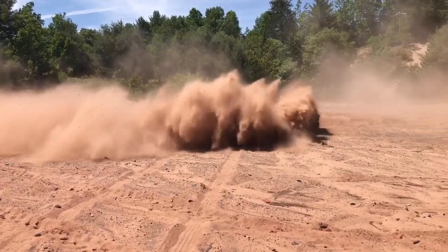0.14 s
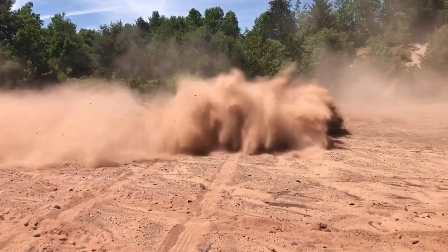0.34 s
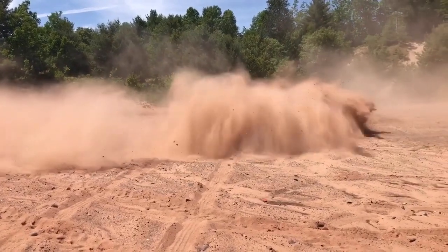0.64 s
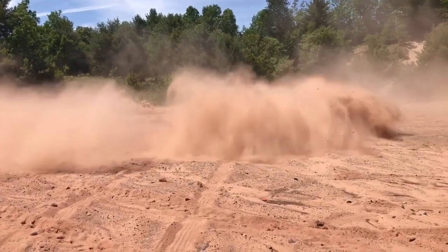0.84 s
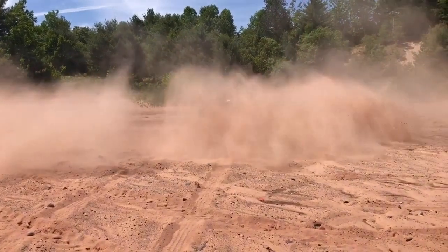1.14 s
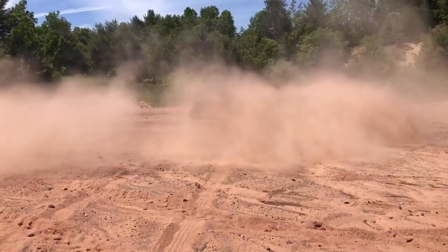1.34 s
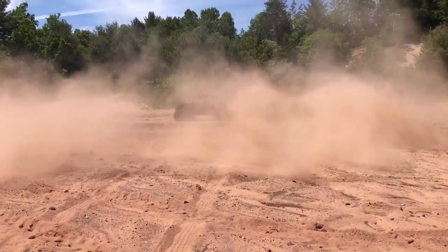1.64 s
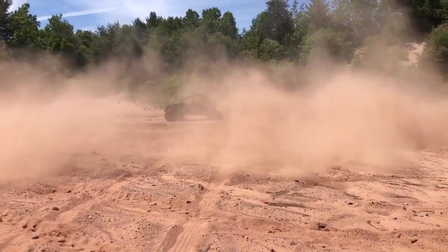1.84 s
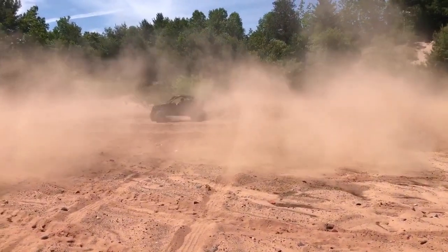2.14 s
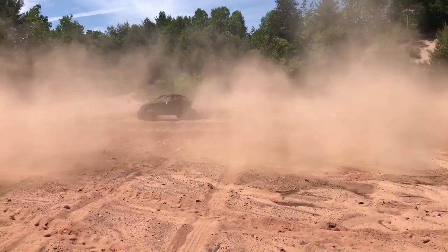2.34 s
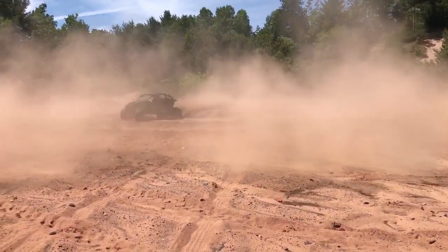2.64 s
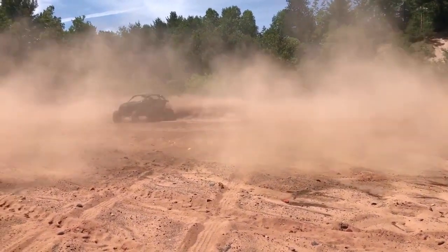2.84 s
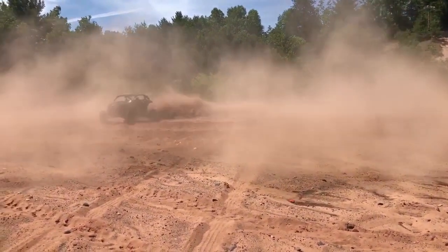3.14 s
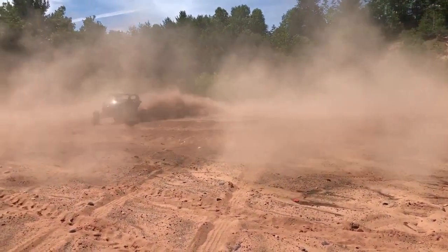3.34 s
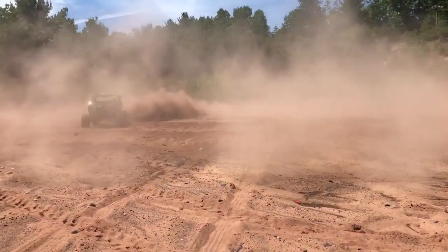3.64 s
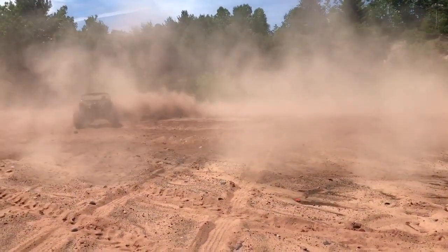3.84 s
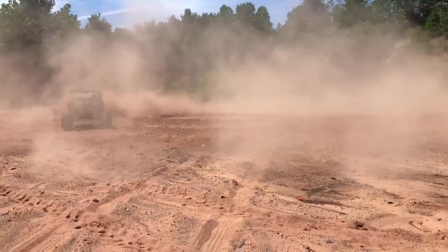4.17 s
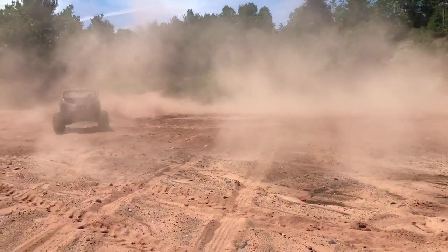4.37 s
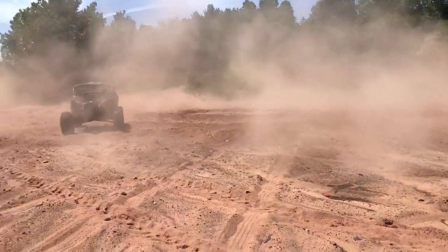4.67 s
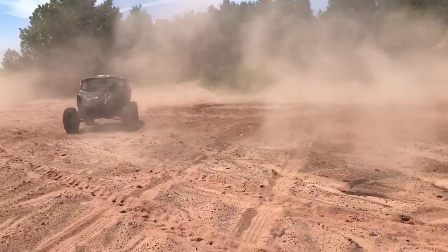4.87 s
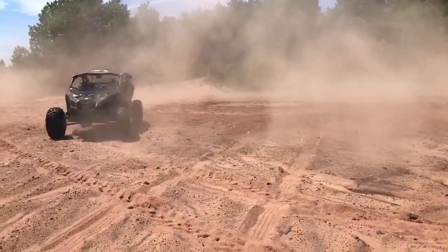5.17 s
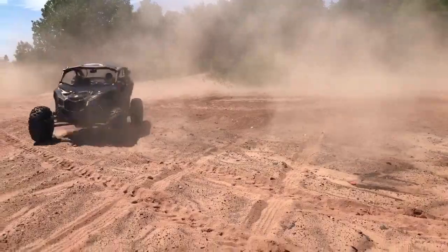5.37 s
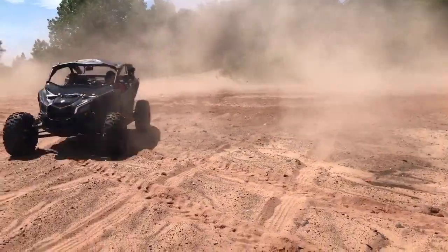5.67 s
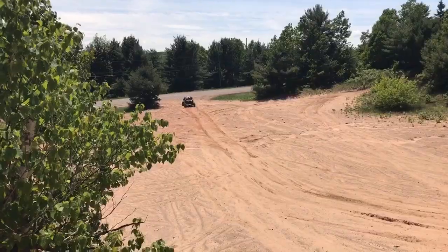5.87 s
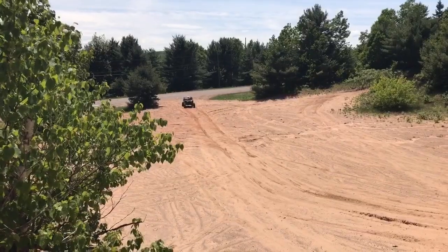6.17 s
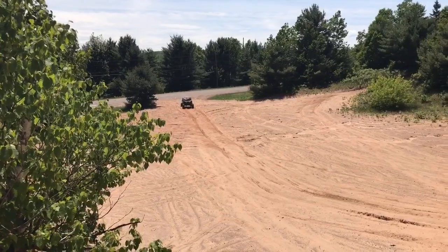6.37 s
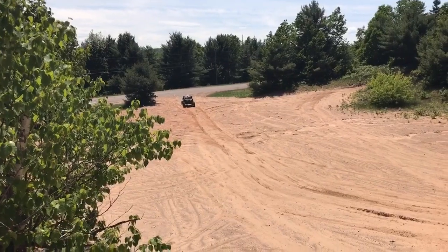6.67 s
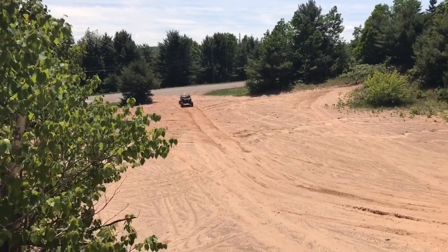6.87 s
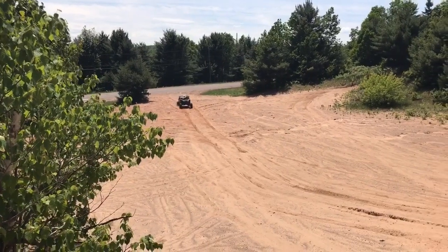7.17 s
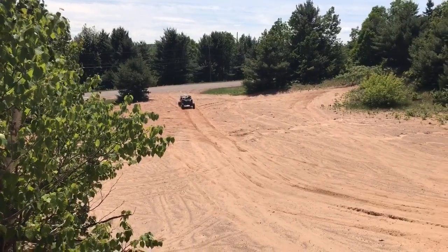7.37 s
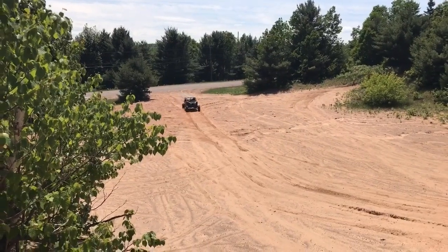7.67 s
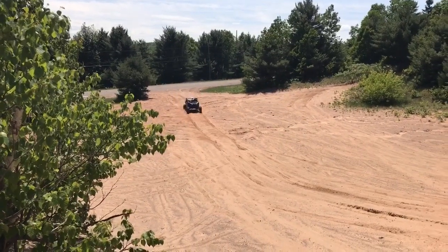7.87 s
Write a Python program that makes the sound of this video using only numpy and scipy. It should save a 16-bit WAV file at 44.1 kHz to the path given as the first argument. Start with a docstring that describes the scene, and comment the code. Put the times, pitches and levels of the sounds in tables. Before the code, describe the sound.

Outdoors on sand, a buggy engine drones at high revs as it passes near the microphone with a raspy exhaust, a short tyre howl and spraying grit. A belt whirrs along with it. The throttle closes and the note sinks to a low burble, while stones tick and the chassis squeaks. The sound cuts out for a moment, then returns duller and more distant, revving up and holding.

```python
"""You hear an off-road buggy slide past on loose sand at high revs, turn, and roll up as the throttle closes.
After a short silence the scene changes: the buggy is heard far away, revving high. Its three cylinders fire in
turn to make the engine note, while exhaust gas rasps and hisses in the tailpipe. The drive belt whirrs, the
tyres churn, spray sand and howl as they slide, small stones tick and the chassis squeaks."""
import sys
import numpy as np
from scipy import signal
from scipy.fft import rfft, irfft, next_fast_len
from scipy.io import wavfile

SR = 44100
rng = np.random.default_rng(int(sys.argv[2]) if len(sys.argv) > 2 else 0)


def materialize(psi):
    """Save the field psi as 16-bit PCM at rate SR to the path in sys.argv[1].

    A 1-D psi becomes a single channel; in a 2-D psi each row is a channel.
    """
    bounded = np.clip(np.atleast_2d(psi).T, -1, 1)
    quanta = np.round(bounded * 32767).astype(np.int16)
    wavfile.write(sys.argv[1], SR, quanta)


N = 353241
TIME = np.arange(N) / SR

# when the throttle is shut: (from [s], until [s], brief sag of the firing note [dB])
LIFT_OFF_TIMES = [(4.596, 4.659, -6), (5.026, 5.6, -5)]


def from_db(db):
    """Turn decibels into a gain."""
    return 10 ** (np.asarray(db) / 20)


def unit_power(x):
    """Scale a sound to a power of 1."""
    return x / np.sqrt(np.mean(x ** 2) + 1e-20)


def unit_power_between(x, low_hz, high_hz):
    """Scale a sound so that one band of it has a power of 1."""
    part = rfft(x)[int(low_hz * N / SR):int(high_hz * N / SR)]
    return x * N / np.sqrt(2 * np.sum(np.abs(part) ** 2))


def curves(rows):
    """Join the rows of a time table into one curve for each value column."""
    times, *columns = np.transpose(rows)
    return [np.interp(TIME, times, column) for column in columns]


def gain_at(spectrum, hz):
    """Look up a gain in a spectrum table."""
    table_hz, db = np.transpose(spectrum)
    return from_db(np.interp(np.log(hz + 1e-6), np.log(table_hz), db))


def colour(x, spectrum):
    """Shape a sound's lows and highs with a spectrum table."""
    size = next_fast_len(N)
    hz = np.arange(size // 2 + 1) * SR / size
    return irfft(rfft(x, size) * gain_at(spectrum, hz), size)[:N]


def band(x, low_hz, high_hz):
    """Keep what lies between two frequencies."""
    sos = signal.butter(3, [low_hz, min(high_hz, SR * .45)], "band", fs=SR, output="sos")
    return signal.sosfilt(sos, x)


def drift(rate_hz):
    """A smooth random wander, about 1 in size."""
    step = 40  # samples between random points
    pole = np.exp(-2 * np.pi * step * rate_hz / SR)
    slow = signal.lfilter([1], [1, -2 * pole, pole * pole], rng.standard_normal(N // step + 2002))[2000:]
    return np.interp(np.arange(N) / step, np.arange(len(slow)), unit_power(slow))


def bump(centre_s, half_s):
    """A smooth rise to 1 and back."""
    return np.exp(-((TIME - centre_s) / half_s) ** 2)


def sweep_past(full_s, until_s, db, rise_db_per_s, fall_db_per_s):
    """The gain of a passing sound: it rises, holds and dies away."""
    before, after = np.maximum(full_s - TIME, 0), np.maximum(TIME - until_s, 0)
    return from_db(db - rise_db_per_s * before - fall_db_per_s * after)


def resonate(strength, modes, flutter_db):
    """Noise rings in several resonances, and each flutters by itself."""
    out = np.zeros(N)
    for hz, width, db in modes:
        gain = from_db(db + flutter_db * drift(15))
        out += gain * band(strength * rng.standard_normal(N), hz - width / 2, hz + width / 2)
    return unit_power(out)


def grains(per_s, spread_db):
    """Tiny random impacts of unequal size."""
    sizes = from_db(spread_db * np.minimum(rng.exponential(1, N), 4)) * rng.choice([-1, 1], N)
    return unit_power(sizes * (rng.random(N) < per_s / SR))


def throttle_shut(move_s=0.018):
    """0 while the throttle is open, 1 while it is shut."""
    return sum(np.clip(np.minimum(TIME - start, end - TIME) / move_s + .5, 0, 1)
               for start, end, _ in LIFT_OFF_TIMES)


def harmonic_levels(firing_hz, note_db, overtones_db, sag_s=0.053, silencer_hz=384.4):
    """The first three exhaust harmonics in dB; shutting the throttle takes the edge off the pulses."""
    # overtones fade or swell as the buggy turns:
    # (time [s], half length [s], second harmonic change [dB], third harmonic change [dB])
    turns = [(1.83, .055, -35, 0), (2.049, 0.29, -4.5, 1.5), (2.293, 0.13, -14.5, 2),
             (2.617, 0.044, -6.5, -1), (2.85, 0.29, -2.5, -15), (3.311, 0.13, -12.5, 0),
             (6.004, 0.73, -2.5, 10.5), (6.853, 0.34, 1, 6.5)]
    shut = throttle_shut()
    silencer_db = 59.5 * np.maximum(np.log2(3 * firing_hz / silencer_hz), 0)  # bites at high revs
    first = note_db + sum(db * bump(start + sag_s / 2, sag_s / 2) for start, _, db in LIFT_OFF_TIMES)
    second = overtones_db - 17 * shut
    third = overtones_db - 2 - 14 * shut - silencer_db
    for at_s, half_s, second_db, third_db in turns:
        second += second_db * bump(at_s, half_s)
        third += third_db * bump(at_s, half_s)
    return [db + 0.95 * drift(6) for db in (first, second, third)]


def exhaust(firing_hz, phase, levels_db):
    """Each firing is one rounded pressure pulse; the silencer lets little out above the third harmonic."""
    # how the pipe passes the upper harmonics: (frequency [Hz], gain [dB])
    pipe = [(200, -6), (300, -9), (370, -1.5), (450, -15.5), (520, -26.5), (620, -17.5), (700, -41.5)]
    throb = from_db(0.45 * drift(25))
    low = sum(from_db(db) * np.cos(k * phase) for k, db in enumerate(levels_db, 1))
    upper = sum(from_db(db) * gain_at(pipe, k * firing_hz) * np.cos(k * phase)
                for k, db in ((4, 0), (5, -3)))
    return -np.sqrt(2) * throb * (low + from_db(levels_db[2]) * upper)


def rumble(firing_hz, full_revs_hz=155):
    """Low engine noise that grows by 5 dB for each octave the revs sink."""
    # rumble spectrum: (frequency [Hz], gain [dB])
    spectrum = [(15, -23.5), (30, -4.5), (50, 2), (110, 2), (160, -15.5), (300, -16.5), (600, -21.5),
                (900, -21), (1800, -55.5)]
    gain = from_db(-28.5 + 5 * np.log2(full_revs_hz / firing_hz))
    return gain * unit_power(colour(rng.standard_normal(N), spectrum))


def burble(phase, overtones_db):
    """Unequal cylinders add wavering tones at thirds of the firing rate; noise fills the gaps."""
    # the tones: (multiple of a third of the firing rate, relative level [dB])
    uneven = [(1, -8.5), (4, -3), (5, -3.5), (7, -5), (8, -13)]
    # the noise between them: (frequency [Hz], gain [dB])
    spectrum = [(50, -15), (130, -0.5), (230, 1), (340, -2), (440, -7.5), (540, -21.5), (1000, -58.5)]
    # the engine stumbles with a low, rough thud: (time [s], level [dB])
    stumbles = [(0.37, -31), (1.14, -18), (1.46, -22), (4.63, -23)]
    tones = sum(from_db(db + 5 * drift(7)) * np.cos(k * phase / 3 + 0.7 * drift(6)) for k, db in uneven)
    noise = from_db(4) * unit_power(colour(rng.standard_normal(N), spectrum))
    gain = from_db(-11 + 0.9 * overtones_db - 2 * throttle_shut())
    thuds = sum(from_db(db) * bump(at_s, half_s=0.026) for at_s, db in stumbles)
    return (gain + thuds) * unit_power(unit_power(tones) + noise)


def engine(firing_hz, phase, crank):
    """The exhaust note, a shake at each turn of the crankshaft, rumble and burble."""
    # the engine's base levels: (time [s], firing note [dB], overtones [dB], crank shake [dB])
    loudness = [(0, -14, -11.5, -34), (0.36, -13.5, -10, -29), (0.43, -16, -16, -24.5),
                (0.58, -14, -11, -33.5), (0.85, -12.5, -13.5, -34), (1.1, -19.5, -13, -28.5),
                (1.45, -17.5, -15.5, -32), (1.6, -19, -18, -24.5), (2.15, -24, -13, -25.5),
                (2.35, -13.5, -16.5, -26), (2.9, -16, -15.5, -27), (3.7, -15.5, -15, -21.5),
                (4.3, -13.5, -13.5, -21), (4.57, -18.5, -20.5, -19), (4.7, -11, -21, -32),
                (5.55, -12.5, -22, -44), (5.82, -17.5, -32, -26.5), (6.35, -19.5, -37, -25),
                (6.58, -18, -28.5, -33), (8, -15, -29, -30)]
    note_db, overtones_db, shake_db = curves(loudness)
    note = exhaust(firing_hz, phase, harmonic_levels(firing_hz, note_db, overtones_db))
    shake = from_db(shake_db + 1.8 * drift(9)) * np.cos(crank + 0.47 * drift(7))
    return note + shake + rumble(firing_hz) + burble(phase, overtones_db)


def belt_whirr(crank):
    """The rubbing drive belt rings in one moving resonance, pulsing with the crankshaft."""
    # the whirr: (time [s], level [dB], centre [Hz])
    belt = [(0, -32.5, 2156), (1.35, -23.5, 2230), (1.62, -24.5, 2200), (2.2, -23, 2250), (2.48, -26, 2300),
            (2.9, -24, 2334), (3.45, -28, 2388), (3.72, -37, 2482), (4.3, -33, 2523), (4.7, -40.5, 2490),
            (5.55, -40.5, 2517), (5.82, -23.5, 2174), (6.2, -27, 2181), (6.9, -23, 2173), (8, -22, 2220)]

    def wobble(width_hz):
        """Two random curves that blur a tone into a band of noise."""
        sos = signal.butter(2, width_hz / 2, fs=SR, output="sos")
        return unit_power(signal.sosfilt(sos, rng.standard_normal((2, N))))

    db, centre_hz = curves(belt)
    cos_part, sin_part = wobble(247) + from_db(-3) * wobble(895)  # a narrow peak on a broad base
    angle = 2 * np.pi * np.cumsum(centre_hz) / SR
    whirr = unit_power(cos_part * np.cos(angle) + sin_part * np.sin(angle))
    return from_db(db) * (1 + 0.13 * np.cos(crank)) * whirr


def patchy(x, depth_db, rate_hz, bands=13):
    """Sheets of sand shift, so each band of the sound swells and fades by itself."""
    spectrum, hz = rfft(x), np.arange(N // 2 + 1) * SR / N
    place = np.interp(hz, np.geomspace(600, 19200, bands), np.arange(bands))
    parts = (irfft(spectrum * np.maximum(1 - np.abs(place - k), 0), N) for k in range(bands))
    return sum(from_db(depth_db * drift(rate_hz)) * part for part in parts)


def sand(far):
    """Tyre treads churn the ground and throw clumps of grains; distance changes the tone of both."""
    # spinning wheels: (time [s], churn at 700-1150 Hz [dB], spray at 5000-6200 Hz [dB])
    wheelspin = [(0, -28.5, -37.5), (0.43, -31, -39), (0.57, -27, -31.5), (1.05, -29.5, -28.5),
                 (1.5, -31.5, -31.5), (1.62, -32, -34.5), (2.6, -31, -32.5), (3.5, -33.5, -33),
                 (3.68, -37.5, -42), (4.1, -38, -42), (4.33, -35, -40.5), (4.72, -42.5, -46.5),
                 (5.1, -40, -45.5), (5.55, -39.5, -45.5), (5.9, -40, -45), (6.05, -42, -51.5),
                 (6.3, -40.5, -53), (6.65, -39, -50), (8, -36.5, -44.5)]
    # spectra of churn and spray, near and far: (frequency [Hz], gain [dB])
    churn_near = [(200, -9), (450, -15), (600, -11.5), (760, -3.5), (950, 1), (1300, 1), (1650, -1),
                  (2000, -1), (2600, -16), (4000, -21.5), (9000, -58.5)]
    churn_far = [(200, -5), (450, 3), (660, -27), (900, -4), (1170, 2.5), (1430, -5), (1900, -1),
                 (3000, -7.5), (6000, -54)]
    spray_near = [(1200, -10), (2500, 0.5), (3200, 1.5), (4100, 4), (5200, -1), (5900, 0), (7400, -2),
                  (8400, -15), (9500, -15), (10600, -20), (12300, -16), (13500, -34), (15600, -36.5)]
    spray_far = [(1500, -5), (2800, 5.5), (3700, 6.5), (4800, 0), (6000, -5.5), (7500, -16.5),
                 (10000, -20.5), (12500, -25), (14000, -47), (15600, -33)]
    churn_db, spray_db = curves(wheelspin)
    clods = grains(per_s=9000, spread_db=3) * from_db(0.71 * drift(25))
    fine = grains(per_s=20000, spread_db=2.5) * from_db(0.76 * drift(35))
    churn = np.where(far, unit_power_between(colour(clods, churn_far), 700, 1150),
                     unit_power_between(colour(clods, churn_near), 700, 1150))
    spray = np.where(far, unit_power_between(colour(fine, spray_far), 5000, 6200),
                     unit_power_between(colour(fine, spray_near), 5000, 6200))
    return patchy(from_db(churn_db) * churn + from_db(spray_db) * spray, depth_db=1.22, rate_hz=4.9)


def tailpipe(phase):
    """Puffs of gas rasp in the pipe and hiss at its mouth, loudest while it points at the listener."""
    # resonances of the pipe and of its mouth: (centre [Hz], width [Hz], relative level [dB])
    rasp_modes = [(2087, 160, -3), (2305, 126, -1), (2820, 240, 1), (3533, 260, -6), (4570, 410, -12.5)]
    mouth_modes = [(6940, 780, 0.5), (9170, 1600, -8.5), (11400, 2000, -14)]
    # the rasp swells as the buggy passes and as its tail swings:
    # (full from [s], until [s], level [dB], rise [dB/s], fall [dB/s])
    surges = [(0.5, 1.83, -26, 8.5, 9), (0.72, 0.82, -16.5, 32, 25), (1.25, 1.46, -17.5, 24, 49)]
    rasp_gain = np.max([sweep_past(*surge) for surge in surges], axis=0)
    hiss_gain = sweep_past(full_s=0.9, until_s=1.25, db=-25, rise_db_per_s=17.5, fall_db_per_s=17.5)
    rasp = resonate(1 + 0.46 * np.cos(phase), rasp_modes, flutter_db=2.7)
    hiss = resonate(1 + 0.21 * np.cos(phase), mouth_modes, flutter_db=3)
    return rasp_gain * rasp + hiss_gain * hiss


def tyre_howl():
    """The tyres howl briefly as they slide past."""
    # resonances of the howl: (centre [Hz], width [Hz], relative level [dB])
    modes = [(1292, 240, 1), (1504, 160, 1)]
    gain = sweep_past(full_s=0.83, until_s=1, db=-20.5, rise_db_per_s=45, fall_db_per_s=42)
    return gain * resonate(1, modes, flutter_db=1.5)


def stones():
    """Each stone lands with a short gritty tick and a thin bright crack."""
    # stones flicked up: (time [s], level [dB], time to fade by 30 dB [s], centre [Hz])
    landings = [(3.565, -29, 0.096, 5995), (4.2, -35, 0.11, 6800), (4.375, -30.5, 0.048, 5500),
                (4.634, -36, 0.039, 5314), (5.36, -39, 0.09, 7018), (5.49, -37, .1, 6000),
                (6.756, -43.5, 0.034, 8050), (6.949, -44, 0.05, 6990), (6.982, -38, 0.057, 7100),
                (7.384, -42, 0.058, 7450), (7.418, -39.5, .07, 7000), (7.556, -46, 0.043, 4937),
                (7.719, -36, .03, 5260), (7.994, -39, .04, 5306)]
    out, grit = np.zeros(N), grains(per_s=8100, spread_db=5)
    crack = from_db(-17) * unit_power(band(grains(per_s=6000, spread_db=-2), 9000, 14000))
    for at_s, db, decay_s, hz in landings:
        start = int(at_s * SR)
        tick = (unit_power(band(grit, hz / 1.32, hz * 1.32)) + crack)[start:start + SR // 4]
        out[start:start + len(tick)] += tick * from_db(db - 30 * TIME[:len(tick)] / decay_s)
    return out


def squeaks():
    """Chassis parts stick and slip: an unsteady gliding tone with a dry, rattling scrape."""
    # (time [s], level [dB], length [s], start pitch [Hz], end pitch [Hz], scrape against the tone [dB])
    rubs = [(3.708, -33.5, 0.033, 5700, 5700, -9), (4.283, -31, .04, 5500, 5105, -15),
            (5.235, -32, 0.021, 3920, 4000, -4), (5.256, -26, 0.051, 5975, 7350, -1),
            (5.263, -26, 0.024, 4000, 3616, -11), (5.401, -24, 0.03, 5950, 6780, -10),
            (5.45, -29, 0.029, 5690, 5500, -6), (7.553, -30, 0.016, 5200, 5113, -15)]
    out, waver = np.zeros(N), 0.06 * drift(270)
    slips = grains(per_s=9400, spread_db=5)
    scrape = unit_power(band(slips, 3800, 8700) + from_db(-8.5) * band(slips, 7900, 13000))
    for at_s, db, length_s, start_hz, end_hz, scrape_db in rubs:
        on = (TIME >= at_s) & (TIME < at_s + length_s)
        progress = (TIME[on] - at_s) / length_s
        hz = (start_hz + (end_hz - start_hz) * progress) * (1 + waver[on])
        tone = np.sqrt(2) * np.sin(2 * np.pi * np.cumsum(hz) / SR)
        out[on] += from_db(db) * np.sin(np.pi * progress) * (tone + from_db(scrape_db) * scrape[on])
    return out


def scene():
    """The buggy close by and then far away, with a short silence between."""
    # engine speed, near and far: (time [s], firing rate [Hz])
    revs_near = [(0.0, 153.4), (0.49, 155), (0.8, 162.4), (1.08, 160.5), (1.19, 150), (1.45, 165),
                 (1.55, 145), (1.93, 148), (2.16, 159), (2.52, 149), (3.2, 161.4), (3.39, 150), (3.48, 163),
                 (3.71, 147), (3.96, 150), (4.13, 132.5), (4.28, 139), (4.4, 125), (4.58, 114),
                 (4.67, 90.8), (5.01, 90), (5.16, 75.8), (5.36, 66), (5.55, 62.8)]
    revs_far = [(5.83, 134.8), (6.07, 140), (6.22, 138.6), (6.54, 161.6), (6.95, 157.3), (7.34, 158.8),
                (7.7, 165.1), (7.8, 161.8), (8.0, 168)]
    near_end_s, fade_out_s, far_start_s, fade_in_s = 5.569, 0.012, 5.818, 0.002
    far = TIME > near_end_s
    firing_hz = np.where(far, curves(revs_far)[0], curves(revs_near)[0])
    phase = 2 * np.pi * np.cumsum(firing_hz * (1 + 0.00802 * drift(12))) / SR
    crank = phase * 2 / 3  # two turns for every three firings
    belt = belt_whirr(crank)
    ground = tyre_howl() + sand(far) + stones()
    sound = engine(firing_hz, phase, crank) + tailpipe(phase) + belt + ground + squeaks()
    near_gain = np.clip((near_end_s - TIME) / fade_out_s, 0, 1)
    far_gain = np.clip((TIME - far_start_s) / fade_in_s, 0, 1)
    return (sound * (near_gain + far_gain))[None]


def record(dry):
    """Round off the loudest peaks and cut the treble above 16300 Hz."""
    rounded = dry / (1 + dry ** 8) ** (1 / 8)
    return signal.sosfilt(signal.cheby2(16, 70, 16300, fs=SR, output="sos"), rounded)


dry = scene()
out = record(dry)
materialize(out)
```